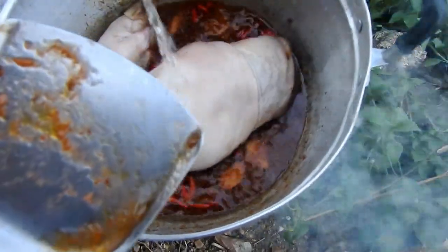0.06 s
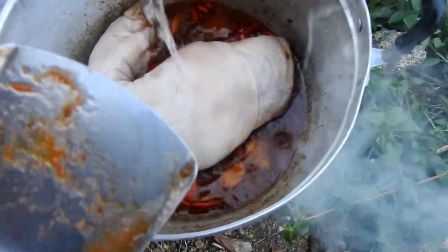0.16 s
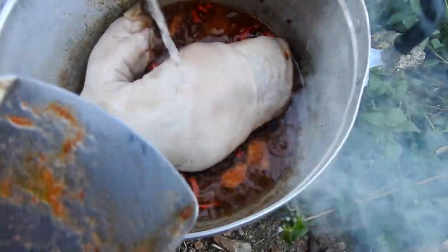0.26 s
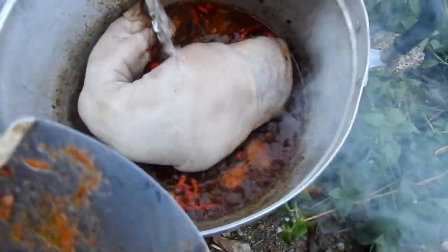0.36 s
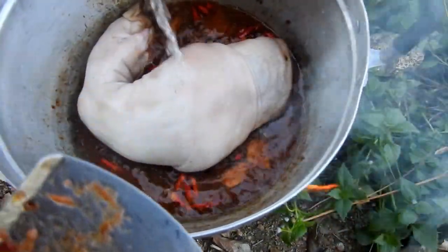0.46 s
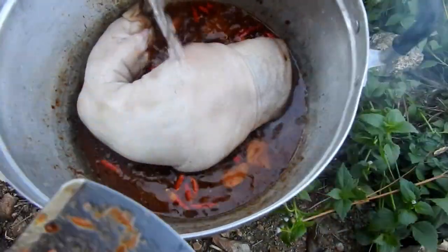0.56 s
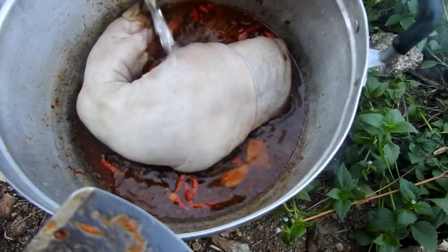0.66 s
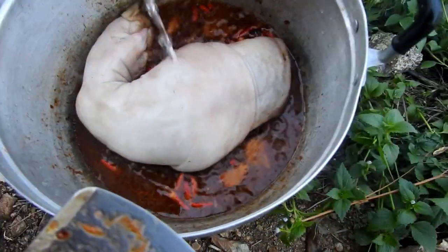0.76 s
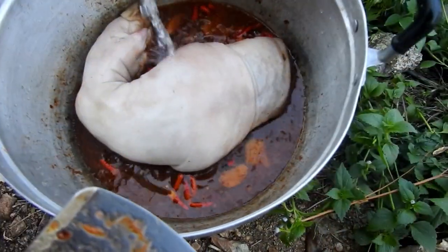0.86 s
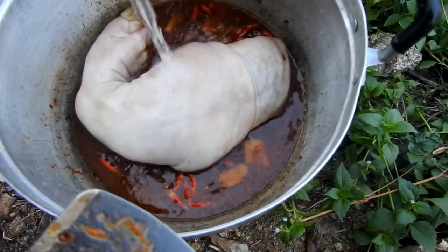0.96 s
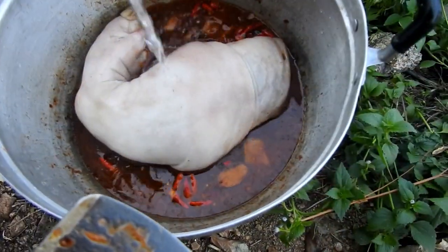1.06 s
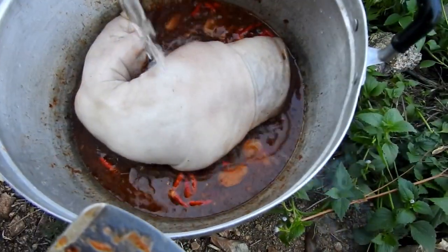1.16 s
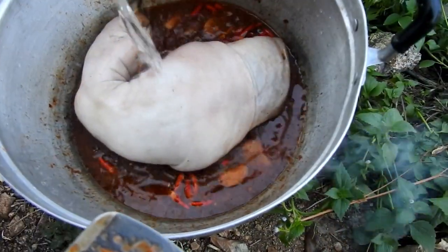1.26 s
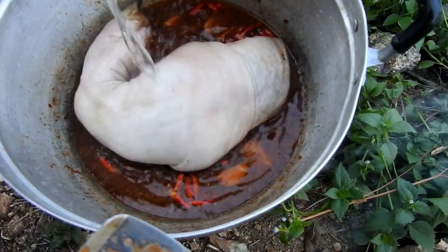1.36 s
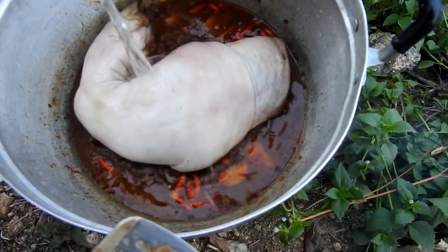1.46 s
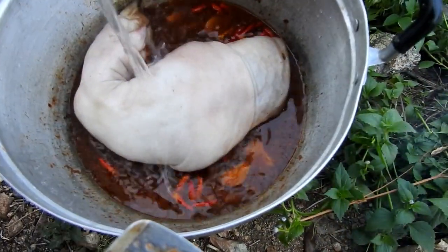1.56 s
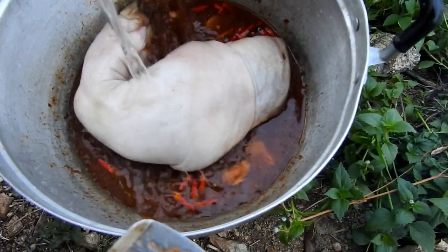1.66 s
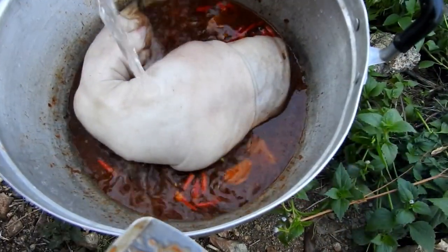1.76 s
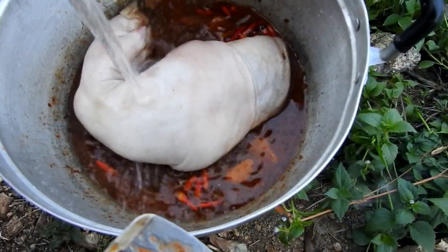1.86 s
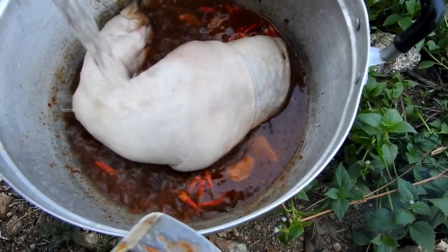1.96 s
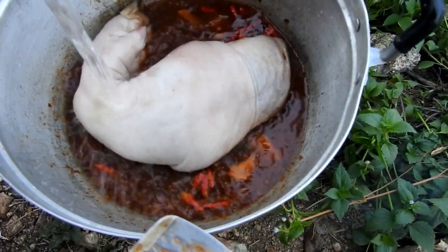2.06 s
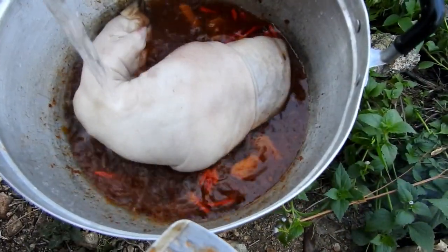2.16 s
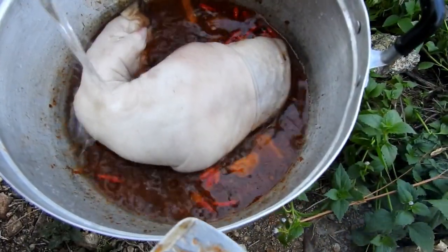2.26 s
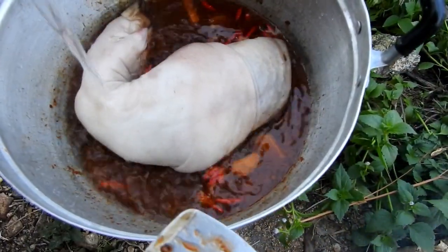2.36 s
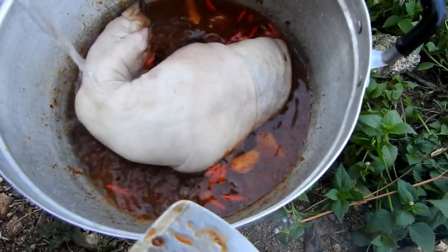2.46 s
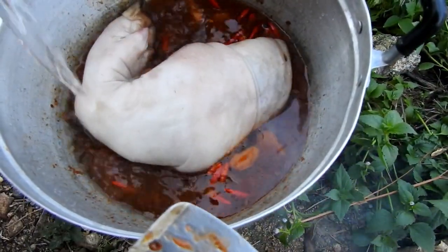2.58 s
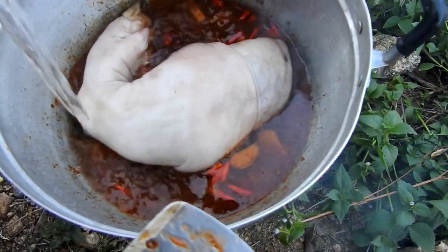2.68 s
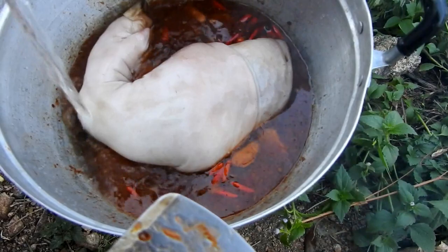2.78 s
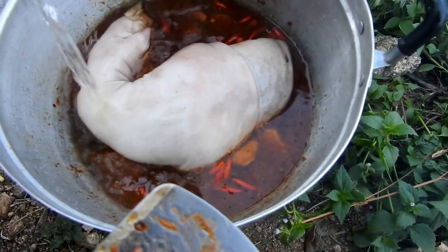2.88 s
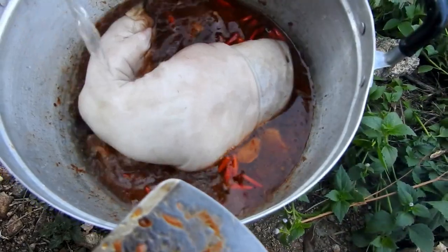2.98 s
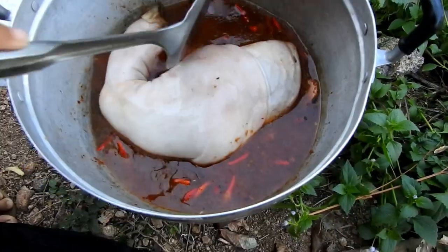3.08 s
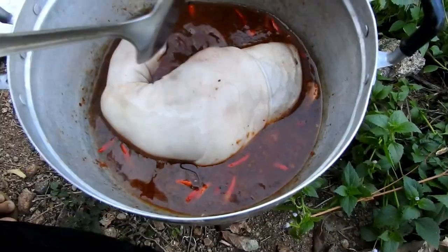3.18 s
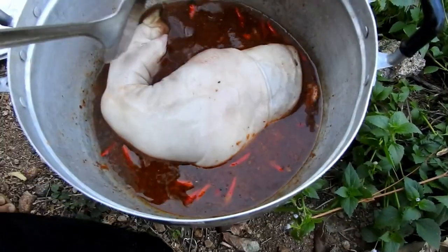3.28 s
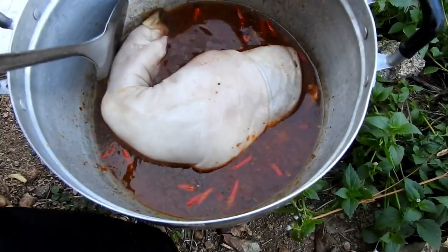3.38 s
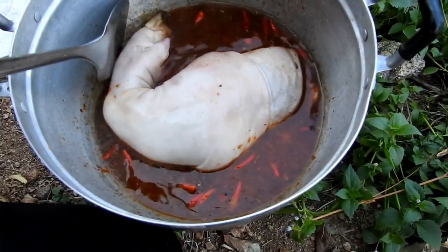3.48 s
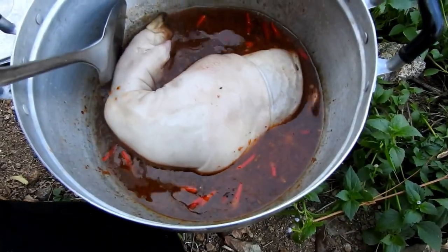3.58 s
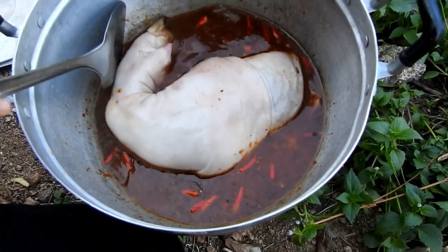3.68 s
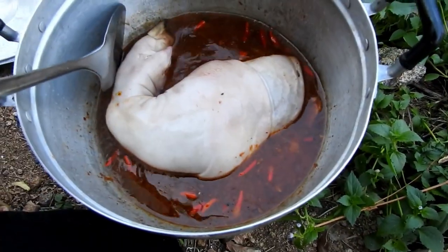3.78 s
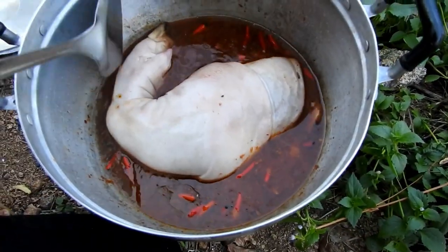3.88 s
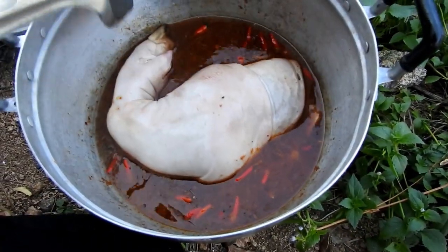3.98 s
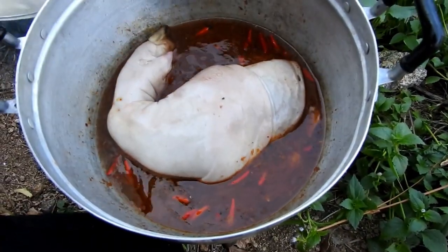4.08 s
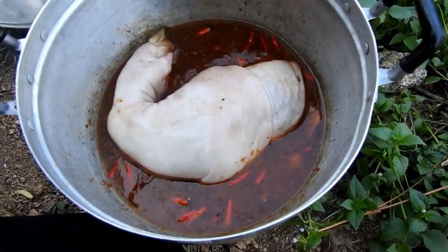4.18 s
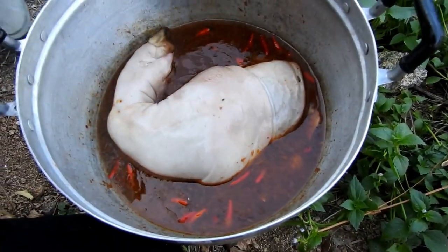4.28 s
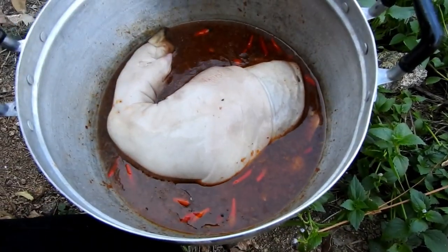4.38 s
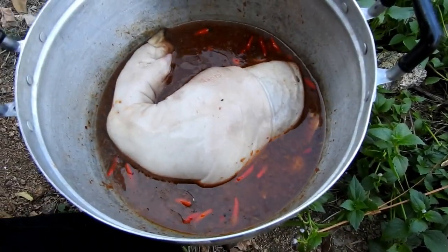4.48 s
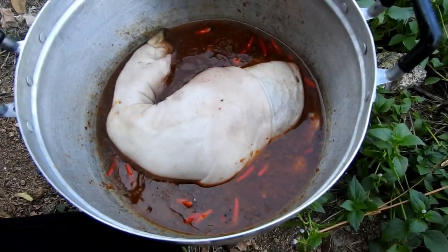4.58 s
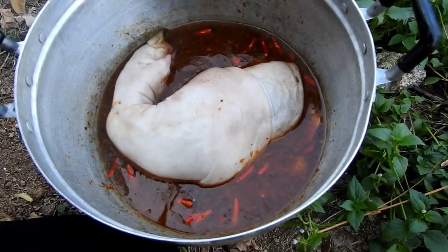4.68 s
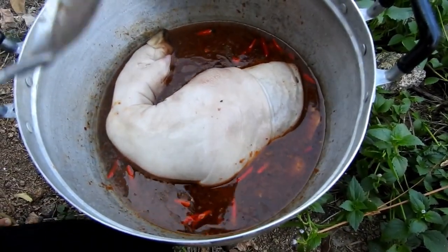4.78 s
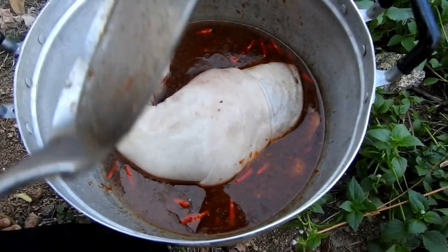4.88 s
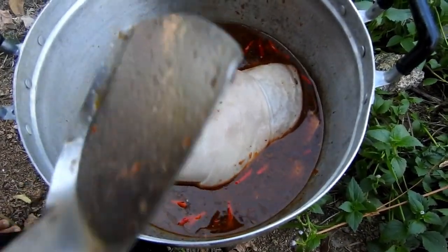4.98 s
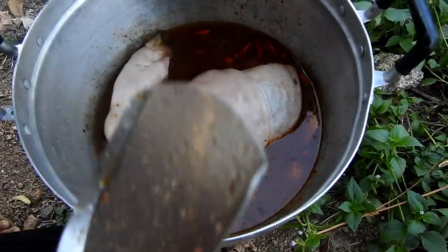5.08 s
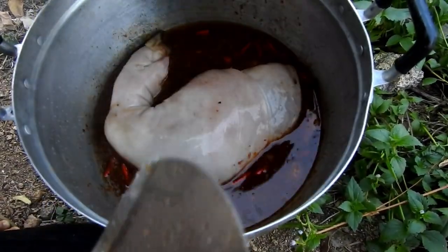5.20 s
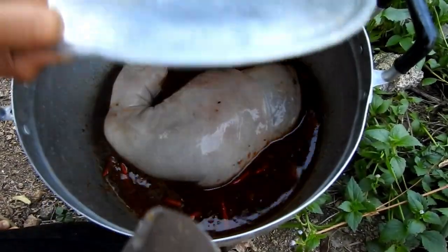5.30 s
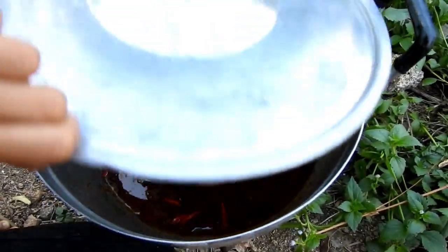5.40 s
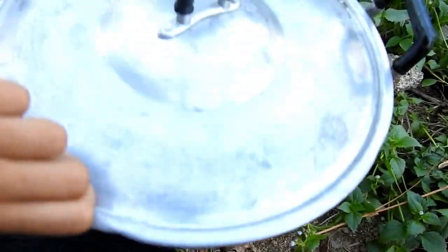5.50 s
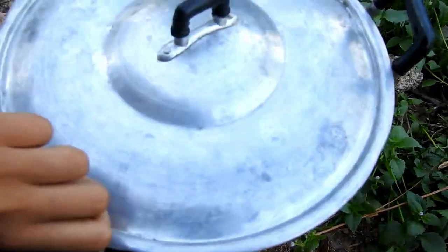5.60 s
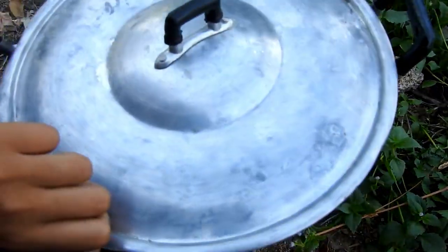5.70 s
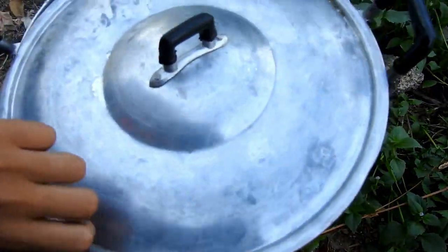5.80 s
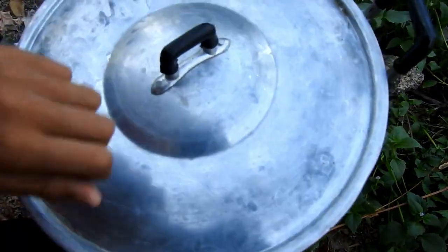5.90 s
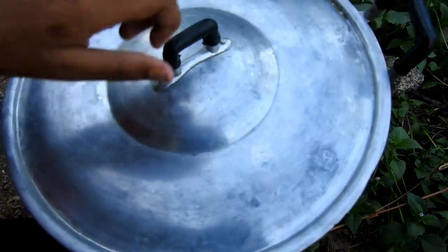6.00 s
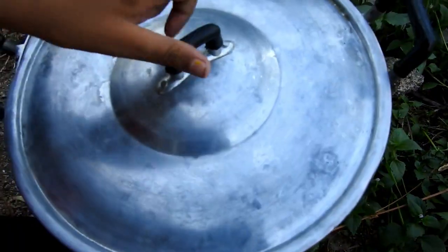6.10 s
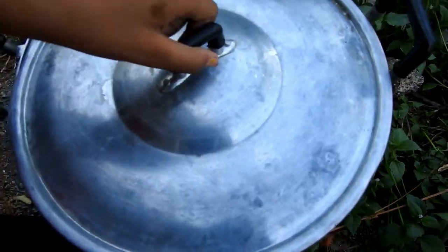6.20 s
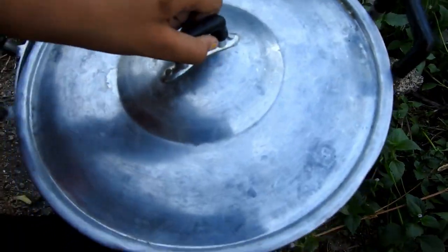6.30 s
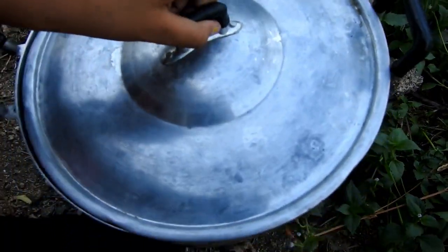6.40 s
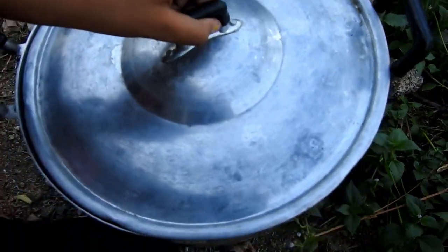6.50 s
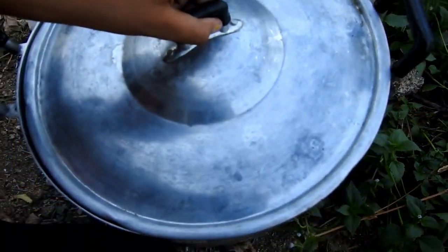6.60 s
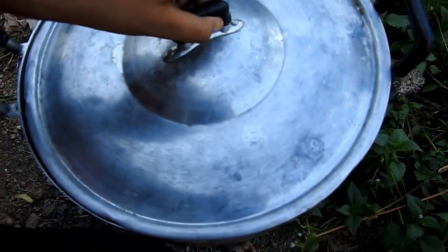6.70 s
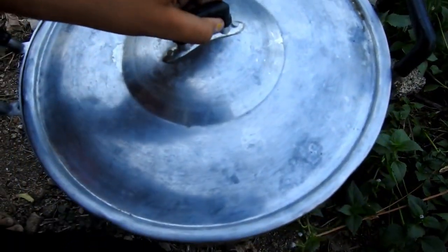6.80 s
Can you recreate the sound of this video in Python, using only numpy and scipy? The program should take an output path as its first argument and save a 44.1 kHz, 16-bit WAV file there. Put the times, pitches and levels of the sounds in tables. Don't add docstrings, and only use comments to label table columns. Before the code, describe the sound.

Water hisses and plinks onto meat in a big aluminium pot over a roaring fire; after brief silence, a spoon knocks, then the lid clatters on.

```python
import sys
import numpy as np
from scipy import signal
from scipy.fft import rfft, irfft
from scipy.io import wavfile
from scipy.ndimage import uniform_filter1d

SR = 44100
rng = np.random.default_rng(int(sys.argv[2]) if len(sys.argv) > 2 else 0)


def store_wav(level_fs):
    pcm = np.round(np.clip(np.atleast_2d(level_fs), -1, 1) * 32767)
    wavfile.write(sys.argv[1], SR, pcm.T.astype(np.int16))


def rack_gain(trim_db):
    fader = np.asarray(trim_db, float)
    return 10 ** (fader / 20)


N = 302085

# start_s, end_s
SILENCE_S = (2.854, 3.102)
# start_s, held_s, boom_db, bright_grit_db, swell_while_held_db
LID_STROKES = [(5.205, 0.0017, -10.5, -8, -2.5), (5.224, 0.082, -20, -17, 2), (5.315, 0.061, -26.5, -18, 0),
               (5.37, 0.072, -24.5, -12.5, -5.5), (5.455, 0.076, -17, -17.5, -5.5),
               (5.515, 0.15, -11.5, -18.5, -27.5), (5.657, 0.056, -12, -27.5, -33),
               (5.745, 0.058, -36.5, -39.5, 28), (5.785, 0.103, -16, -18, 2),
               (5.875, 0.13, -24.5, -15.5, 1.5), (5.975, 0.12, -16.5, -15, 0), (6.09, 0.141, -15, -17, -2),
               (6.22, 0.095, -15.5, -16.5, -2.5), (6.342, 0.035, -20, -21.5, 4),
               (6.39, 0.092, -13.5, -19, -0.5), (6.765, 0.074, -30, -38.5, -5.5)]


def rms_one(x):
    return x / np.sqrt(np.mean(x ** 2) + 1e-20)


def in_time(rows):
    t = np.arange(N) / SR
    s, db = np.transpose(rows)
    return rack_gain(np.interp(t, s, db)) * (t < s[-1])


def response(spectrum, size=4096):
    hz, db = np.transpose(spectrum)
    log_hz = np.log(np.maximum(np.arange(size // 2 + 1) * SR / size, 1))
    outside = np.maximum(np.log(hz[0]) - log_hz, 0) + np.maximum(log_hz - np.log(hz[-1]), 0)
    level_db = np.interp(log_hz, np.log(hz), db) - 30 * outside
    cepstrum = irfft(np.log(rack_gain(level_db) + 1e-7))
    cepstrum[1:size // 2] *= 2
    cepstrum[size // 2 + 1:] = 0
    h = irfft(np.exp(rfft(cepstrum)))
    return h / np.sqrt(np.sum(h ** 2))


def colour(x, spectrum):
    return signal.fftconvolve(x, response(spectrum))[:N]


def bandpass(x, low_hz, high_hz):
    return signal.sosfilt(signal.butter(3, [low_hz, high_hz], "band", fs=SR, output="sos"), x)


def treble_of(x):
    return signal.sosfiltfilt(signal.butter(6, 4100, "high", fs=SR, output="sos"), x)


def drift(rate):
    r = np.exp(-80 * np.pi * rate / SR)
    slow = signal.lfilter([1], [1, -2 * r, r * r], rng.standard_normal(N // 40 + 2002))[2000:]
    return np.interp(np.arange(N) / 40, np.arange(len(slow)), rms_one(slow))


def grit(per_s, spread_db):
    sizes = rack_gain(spread_db * np.minimum(rng.exponential(1, N), 5)) * rng.choice([-1, 1], N)
    return rms_one(sizes * (rng.random(N) < per_s / SR))


def add(out, sound, s):
    i = round(s * SR)
    out[..., i:i + sound.shape[-1]] += sound[..., :N - i]


def fire():
    # freq_hz, level_db
    roar_tone = [(25, -34), (55, -8.5), (80, -9.5), (105, 0.5), (140, -4), (204, -16), (470, -21),
                 (1150, -26.5), (1750, -31), (2630, -32.5), (4750, -31.5), (6550, -26.5), (15500, -77)]
    air = colour(rng.standard_normal(N), roar_tone)
    bass = signal.sosfilt(signal.butter(2, 220, fs=SR, output="sos"), air)
    return rack_gain(-32.5) * (air + bass * (rack_gain(1.5 * drift(4)) - 1))


def birds():
    # start_s, end_s, first_hz, last_hz, level_db
    chirps = [
        (3.272, 3.32, 2470, 3360, -59),
        (3.333, 3.403, 3550, 3250, -65),
        (3.535, 3.64, 2500, 1800, -60),
        (4.053, 4.075, 3000, 3600, -60),
        (4.815, 4.858, 2950, 3700, -68),
        (4.975, 5.06, 2950, 3350, -64),
        (4.49, 4.495, 3900, 3180, -52.5),
    ]
    out = np.zeros(N)
    for start, end, first_hz, last_hz, db in chirps:
        hz = np.geomspace(first_hz, last_hz, round((end - start) * SR))
        swell = np.hanning(len(hz)) ** .5
        warble = np.cos(np.arange(len(hz)) / 700) ** 2
        whistle = np.sin(2 * np.pi * np.cumsum(hz) / SR)
        add(out, rack_gain(db + 24.5) * swell * warble * whistle, start)
    return out


def bubble(hz, cycles, rise):
    u = np.arange(round(6 * cycles / hz * SR)) * hz / SR / cycles
    swell = u * np.exp(1 - u - 0.018 * u ** 2)
    return swell * np.sin(2 * np.pi * cycles * u * (1 + rise * (u - 2)))


def swarm(per_s, low_hz, high_hz, cycles):
    out, born = np.zeros(N), grit(per_s, 2.5)
    dealt = rng.integers(0, 14, N)
    for k, hz in enumerate(np.geomspace(low_hz, high_hz, 14)):
        out += signal.fftconvolve(born * (dealt == k), bubble(hz, cycles, 0.03))[:N] * np.sqrt(hz)
    return rms_one(out)


def water_rush():
    # time_s, hiss_db
    force = [(0.0, -22.5), (0.1, -45), (0.57, -62), (0.62, -41.5), (1.42, -42.5), (1.48, -29.5),
             (1.72, -21), (1.77, -26), (1.86, -17.5), (1.97, -31), (2.3, -24.5), (2.58, -34), (2.64, -23.5),
             (2.86, -18.5)]
    # time_s, gurgle_db
    plunge = [
        (0.0, -81),
        (1.7, -83),
        (1.95, -50),
        (2.6, -39.5),
        (2.72, -25.5),
        (2.86, -21.5),
    ]
    # freq_hz, level_db
    spray_tone = [(1290, -30.5), (2200, -24), (2950, -12.5), (3360, -17.5), (3590, 1.5), (4590, 3),
                  (6630, 5.5), (10100, -9.5), (15500, -27)]
    # freq_hz, level_db
    gurgle_tone = [(150, -51.5), (250, -31), (412, -12.5), (700, -20), (1350, -9.5), (2150, -13),
                   (3000, -3), (4400, -26)]
    fizz_tone = [(2000, -16), (4000, 8.0), (6400, 13.5), (9000, -1.0), (15000, -29.0)]
    crackle_tone = [(4000, -1.5), (7000, -0.5), (9500, -8), (15500, -22.5)]

    spray = colour(grit(2500, 4.5) * rack_gain(4.0 * drift(70)), spray_tone) * rack_gain(-12)
    bubbles_per_s = np.where(np.arange(N) < 2.4 * SR, 320, 2000)
    fizz = colour(swarm(bubbles_per_s, 2520, 9700, 2.3), fizz_tone) * rack_gain(-4.5)

    specks = swarm(200, 5000, 13000, 1.2) * rack_gain(4.0 * drift(12) - 5)
    specks = specks + grit(3000, 3.0) * rack_gain(7.0 * np.minimum(drift(70), 2) - 15)
    crackle = colour(specks, crackle_tone) * rack_gain(-42.0)

    low = colour(grit(900, 1.4), gurgle_tone) * rack_gain(2.5)
    low = low + swarm(370, 530, 2630, 1.6) * rack_gain(-19.5)
    pouring = np.arange(N) < SILENCE_S[0] * SR
    return in_time(force) * (spray + fizz) + in_time(plunge) * low + crackle * pouring


def water_drops():
    # time_s, peak_db
    meat_drops = [(0.3665, -18), (0.642, -18.5), (0.768, -15), (0.818, -23), (0.918, -26), (0.9583, -22),
                  (0.9804, -7.5), (1.0095, -3.5), (1.078, -11.5), (1.1152, -16.5), (1.1722, -24),
                  (1.3042, -16), (1.3657, -12), (1.393, -23), (1.434, -19), (1.4473, -5), (1.5224, -13.5),
                  (1.5532, -15), (1.61, -14.5), (1.6419, -11.5), (1.689, -13.5), (1.711, -12),
                  (1.7881, -6.5), (2.0408, -12), (2.12, -14.5), (2.181, -17.5), (2.2084, -8),
                  (2.3319, -12.5), (2.476, -7), (2.523, -10)]
    # time_s, peak_db, pitch_hz
    clear_bubbles = [(0.1502, -15, 4560), (0.614, -20, 4340), (1.29, -18, 5400), (1.3323, -19.5, 3440),
                     (1.589, -14, 4970), (1.6283, -14, 4100), (1.778, -14, 4250), (1.841, -9.5, 5400),
                     (1.8664, -7, 4970), (1.9116, -7.5, 4520), (2.005, -17.5, 3400), (2.086, -18, 3640),
                     (2.1184, -17.5, 3380), (2.338, -10.5, 5254), (2.366, -4, 5800), (2.444, -13.5, 2610),
                     (2.463, -16.5, 2950), (2.619, -7.5, 4550)]
    # time_s, peak_db, pitch_hz
    splashes = [(1.535, -19, 6400), (1.6358, -18, 8450), (1.641, -8, 6570), (1.6566, -15, 6430),
                (1.7053, -9, 7560), (1.719, -13, 5430), (1.7264, -14, 6000), (1.734, -10.5, 7500),
                (1.7434, -16, 6180), (1.7488, -18, 4830), (1.807, -28, 4640), (1.817, -31, 4400),
                (1.855, -10, 4770), (1.871, -3, 6760), (1.888, -22, 4610), (1.9137, -13.5, 6800),
                (1.9402, -19, 6130), (1.958, -16, 6200), (2.019, -14, 5400), (2.0337, -15, 6450),
                (2.5394, -20, 3010), (2.5544, -15, 5700), (2.5761, -21.5, 5360), (2.6032, -17, 5500),
                (2.6322, -8, 6600), (2.6412, -8.5, 5880), (2.6464, -9, 5140), (2.668, -11, 5660),
                (2.695, -11.5, 3810), (2.7065, -6.5, 5780), (2.7237, -3.5, 5180), (2.7345, -9.5, 3410),
                (2.745, -11, 2860), (2.7543, -3.5, 5900), (2.7718, -6.5, 6060), (2.7915, -2.5, 6080),
                (2.816, -7.5, 3880), (2.8228, -6.5, 5910), (2.8482, -5.5, 4580)]
    # time_s, peak_db, pitch_hz
    plinks = [(2.0394, -15.5, 6200), (2.1555, -19, 6300), (2.2405, -16, 7240), (2.217, -14, 6400),
              (2.346, -15, 3060), (2.3136, -17.5, 6200), (2.396, -12.5, 5210), (2.415, -19, 6990),
              (2.429, -18.5, 4680), (2.4994, -18, 6470), (2.5103, -14, 6800)]
    # time_s, peak_db, pitch_hz
    spits = [(.063, -34, 12030), (.104, -33, 10400), (.342, -32.5, 11000), (.382, -36, 11000),
             (.486, -20.5, 11500), (.5, -38, 11000), (.559, -37.5, 12000), (.736, -30, 10500),
             (.746, -26, 5200)]
    # time_s, peak_db, pitch_hz, cycles
    big_bubbles = [(.002, -15, 6700, 13), (0.997, -27, 3900, 10), (1.024, -26, 3980, 9.3),
                   (1.0069, -3, 4640, 1.7), (1.018, -7.5, 4140, 3.8), (1.929, -22, 1940, 4.4),
                   (2.106, -26, 3540, 16), (2.485, -21.5, 2980, 11), (2.289, -26, 2650, 10),
                   (2.804, -16, 445, 0.94), (2.837, -16.5, 1410, 6.2), (2.714, -19, 1477, 4),
                   (2.745, -13, 1910, 1.5), (2.763, -15.5, 1814, 2.5), (2.785, -14.5, 1600, 1.35),
                   (3.163, -27.5, 1960, 2.5)]

    out = np.zeros(N)
    chances = rng.uniform(-0.86, 1, len(meat_drops))
    drops = [(s, db, 6490 * (1 + 0.059 * z)) for (s, db), z in zip(meat_drops, chances)]
    drops += clear_bubbles + splashes + plinks + spits
    t = np.arange(round(.008 * SR)) / SR
    for (s, db, hz), luck in zip(drops, rng.random((len(drops), 2))):
        drop = bubble(hz, 1.6 + 2.4 * luck[0], .05 * luck[1]) * rack_gain(db + 1.5)
        burst = rng.standard_normal(len(t)) * np.exp(-t / .0018)
        spray = np.convolve(drop, np.append(burst, 0)) / np.linalg.norm(drop)
        drop = .9 * np.pad(drop, (0, len(burst))) + .2 * rack_gain(db) * spray
        add(out, drop, s)
        add(out, drop * rack_gain(-11), s + .0028)
    for s, db, hz, cycles in big_bubbles:
        add(out, bubble(hz, cycles, .006) * rack_gain(db), s)
    return out


def stream():
    return (water_rush() + water_drops()) * rack_gain([[.7], [-.7]])


def strokes(rows, attack_s, fall_db_per_s, column):
    t, out = np.arange(N) / SR, np.zeros(N)
    touch_db = -34
    for row in rows:
        s, held, db, swell_db = row[0], max(row[1], 0), row[column], row[-1]
        shape = np.interp(t - s, [0, attack_s, attack_s + held + 1e-4], [touch_db, 0, swell_db])
        fall = fall_db_per_s * np.clip(t - s - attack_s - held, 0, 1)
        out = np.maximum(out, rack_gain(db + shape - fall) * (t >= s))
    return uniform_filter1d(out, size=90)


def ring(x, modes, wander_db):
    out, total = 0, np.sqrt(sum(rack_gain(db) ** 2 for hz, db, t60 in modes))
    for hz, db, t60 in modes:
        r, w = rack_gain(-60 / (t60 * SR)), 2 * np.pi * hz / SR
        feed = x * rack_gain(db + wander_db * np.clip(drift(9), -2, 1.5)) + 1e-18
        strength = 2 * np.sqrt(1 - r) * np.sin(w)
        out = out + signal.lfilter([0, strength], [1, -2 * r * np.cos(w), r * r], feed)
    return out / total


def sheet(x, t60):
    t, out = np.arange(round(t60 * SR)) / SR, 0
    shares = rack_gain([6 * drift(9) for _ in range(3)])
    shares = shares / np.sqrt(np.sum(shares ** 2, axis=0))
    for noise, share in zip(rng.standard_normal((3, len(t))), shares):
        body = noise * rack_gain(-60 * t / t60)
        out = out + signal.fftconvolve(x * share, body / np.sqrt(np.sum(body ** 2)))[:N]
    return out


def patchy(x, patchy_db, rate):
    edges = 1000 * 2 ** np.arange(0, 3.5, 1 / 3)
    change = 0
    for pair in zip(edges, edges[1:]):
        band = signal.sosfiltfilt(signal.butter(2, pair, "band", fs=SR, output="sos"), x)
        change = change + band * (rack_gain(patchy_db * np.clip(drift(rate), -2.5, 1.8)) - 1)
    return x + change


def late_treble(x):
    treble = treble_of(x)
    return x - treble + np.roll(treble, round(.0095 * SR), axis=-1)


def spoon():
    # start_s, held_s, pot_wall_db, bright_grit_db, swell_while_held_db
    rows = [(3.413, 0.006, -14.5, -15, 1), (3.426, 0.039, -22, -20, 4), (3.592, 0.0024, -20.5, -11, -3),
            (3.657, 0.0024, -20, -18.5, -4), (3.764, 0.003, -21, -50, -1), (3.819, 0.012, -30, -35, 6.5),
            (3.84, 0.097, -32.5, -17, 6), (3.89, 0.067, -32, -11.5, -1), (4.134, .012, -39, -28, -4),
            (4.171, 0.112, -38, -32.5, 1), (4.29, .012, -29, -14, -7), (4.315, 0.027, -38, -21.5, 3),
            (4.354, 0.034, -29.5, -18.5, -7.5), (4.4, 0.026, -38, -26.5, -1.5)]
    # freq_hz, level_db
    wall_tone = [(120, -32.5), (200, -15), (371, 6), (571, -2.5), (1240, 5), (1400, -2), (2800, -1),
                 (3900, -11)]
    # freq_hz, level_db
    grit_tone = [(1290, -33), (2200, -12.5), (3130, -0.5), (3830, 3), (4700, 4), (5600, 6.5), (7100, -0.5),
                 (8600, -18.5), (15500, -47)]
    # pitch_hz, level_db, t60_s
    held_modes = [(2328, 11.5, 0.064), (2680, -5, 0.042), (3900, 5.5, 0.073)]
    # pitch_hz, level_db, t60_s
    free_modes = [(1055, -9, 0.45), (1717, -1.5, 0.13), (2374, -16, 0.27), (3210, -16, 0.081),
                  (3830, -3.5, 0.14), (4720, 4, 0.06), (7160, -11, .28)]
    # pitch_hz, level_db, t60_s
    laid_modes = [(1870, -13, .08), (2460, 6, 0.07), (3910, 11, 0.05), (4970, -14, .05), (6000, -12, .05)]

    def bright_gain(some_rows):
        return strokes(some_rows, attack_s=0.0036, fall_db_per_s=699.5, column=3)

    rub = grit(8000, 1.8) * rack_gain(1.3 * drift(40))
    t = np.arange(N) / SR - rows[6][0]
    rub = rub * rack_gain(3 * np.cos(2 * np.pi * 82 * t) * (t > 0) * (t < .1))
    wall = rub * strokes(rows, attack_s=0.0036, fall_db_per_s=400, column=2)
    bright = rub * bright_gain(rows)
    out = colour(wall, wall_tone) * rack_gain(-5.5)
    out = out + colour(0.8 * bright + sheet(bright, .016), grit_tone) * rack_gain(-4.5)
    out = patchy(out, patchy_db=2.0, rate=25)
    grips = [(held_modes, rows[:2], -14), (free_modes, rows[2:4], -14),
             (free_modes, rows[6:8], -16), (laid_modes, rows[8:], -16)]
    for modes, grip_rows, db in grips:
        out += ring(rub * bright_gain(grip_rows), modes, wander_db=1.2) * rack_gain(db)
    return out * rack_gain([[.8], [-.8]])


def lid():
    # freq_hz, level_db
    boom_tone = [(110, -41.5), (180, -15.5), (303, 0.5), (392, -3.5), (960, -6.5), (1470, -2), (2300, -43),
                 (3500, -72)]
    # freq_hz, level_db
    grit_tone = [(1060, -7.5), (1700, -7), (2300, -12), (2950, -8), (4400, -5.5), (6530, -2), (9880, -27),
                 (15500, -66)]
    # pitch_hz, level_db, t60_s
    low_modes = [(267, -11, 0.22), (312, 8.5, 0.086), (466, -22, 0.087), (545, 6, 0.025), (809, -2.5, 0.22),
                 (899, 7.5, 0.019), (984, 6.5, 0.16), (1040, -33, 0.12), (1220, -9, 0.091),
                 (1340, -2.5, 0.38), (1366, 2.5, 0.1), (1462, 9, 0.13), (1647, 1.5, 0.12),
                 (1740, -31, 0.084)]
    # pitch_hz, level_db, t60_s
    high_modes = [(2063, 4.5, 0.051), (2340, -10, 0.084), (2610, 10, 0.076), (2950, 0, 0.11),
                  (3180, 3, 0.037), (3900, 1, 0.11), (3980, 10.5, 0.12), (4500, -2, .1), (4500, 13.5, 0.03),
                  (4800, -7, .07)]

    rub = grit(3500, 3.2) * rack_gain(2.8 * drift(80))
    catch = grit(900, 3.0) * rack_gain(1.8 * drift(70))
    boom = catch * strokes(LID_STROKES, attack_s=0.0094, fall_db_per_s=383, column=2)
    bright = rub * strokes(LID_STROKES, attack_s=0.0094, fall_db_per_s=484, column=3)
    low = colour(1.02 * boom + sheet(boom, 0.13), boom_tone) * rack_gain(-6.5)
    low = low + ring(boom, low_modes, wander_db=2.0) * rack_gain(-6.0)
    high = colour(bright + sheet(bright, 0.063), grit_tone) * rack_gain(-3.0)
    high = high + ring(bright, high_modes, wander_db=6.5) * rack_gain(-13)
    high = patchy(high, patchy_db=2.0, rate=22)
    return (low + high) * rack_gain([[.35], [-.35]])


def singing():
    # start_s, until_s, pitch_hz, level_db, t60_s
    lone_modes = [(3.428, 3.483, 372.4, -28, 0.068), (3.429, 3.488, 1226, -29, 0.045),
                  (3.6, 3.62, 1717, -38.5, 0.56), (3.88, 3.99, 1717, -25.5, 0.43),
                  (3.95, 3.98, 2374, -34.5, 0.41), (4.143, 4.145, 1010, -30, 0.23),
                  (4.301, 4.312, 1014, -32.5, 0.25), (3.955, 3.97, 7160, -36.5, 0.4),
                  (5.255, 5.34, 1273, -21, 0.089), (5.888, 5.965, 992, -16.5, 0.042),
                  (3.594, 3.598, 3110, -25.5, 0.078), (3.657, 3.661, 3090, -30, 0.074),
                  (4.295, 4.33, 3970, -33, .1), (4.36, 4.42, 4000, -36, 0.16),
                  (3.86, 3.95, 3070, -29, 0.045), (5.455, 5.49, 984, -20.5, 0.2),
                  (5.583, 5.594, 809, -16.5, 0.21), (5.68, 5.706, 809, -26.5, 0.28),
                  (6.104, 6.344, 312, -21.5, 0.12), (6.404, 6.49, 267, -20.5, 0.18),
                  (6.487, 6.494, 1366, -32.5, 0.52), (6.772, 6.79, 952, -28, 0.2)]
    # start_s, until_s, pitch_hz, level_db, t60_s
    lid_turns = [(5.242, 5.297, 307.4, -30, 0.14), (5.25, 5.308, 462, -25.5, .08),
                 (5.336, 5.358, 1060, -25.5, 0.071), (5.343, 5.375, 468, -24.5, 0.073),
                 (5.422, 5.479, 596, -25, 0.037), (5.44, 5.463, 817, -26.5, .1),
                 (5.46, 5.552, 1493, -23, 0.093), (5.526, 5.564, 368, -30, 0.069),
                 (5.583, 5.589, 297, -21, 0.065), (5.708, 5.747, 320, -34, .1),
                 (5.788, 5.845, 326, -18.5, 0.092), (5.812, 5.862, 479.5, -23.5, 0.05),
                 (5.817, 5.872, 991, -25, 0.09), (5.984, 5.99, 552, -17, 0.028),
                 (6.027, 6.065, 917, -23.5, 0.061), (6.018, 6.039, 1480, -23.5, 0.072),
                 (6.047, 6.065, 576, -23.5, 0.035), (6.124, 6.129, 958, -12.5, .12),
                 (6.184, 6.21, 815, -17, 0.041), (6.213, 6.242, 984, -19, 0.092),
                 (6.269, 6.302, 945, -17, 0.19), (6.31, 6.324, 312, -19, 0.04),
                 (6.383, 6.415, 980, -17.5, 0.055), (6.461, 6.486, 1366, -20, 0.044)]
    out = np.zeros(N)
    wobbles = [1.4 * drift(54), 3.0 * drift(40), 4.9 * drift(51), 3.0 * drift(40)]
    flutters = rack_gain(np.minimum(wobbles, 2))
    for k, (start, until, hz, db, t60) in enumerate(lone_modes + lid_turns):
        t = np.arange(round((until - start + t60) * SR)) / SR
        swell = np.minimum(t / (until - start), 1) ** .35
        which = 1 + k % 3 if start > LID_STROKES[0][0] else 0
        flutter = np.resize(flutters[which][round(start * SR):], len(t))
        level = rack_gain(db + 3 - 60 * np.maximum(t - until + start, 0) / t60)
        add(out, level * swell * flutter * np.sin(2 * np.pi * hz * t), start)
    return out


def knocks():
    # time_s, peak_db, thud_hz
    blows = [(0.684, -17.5, 445), (3.12, -19, 650), (3.164, -18.5, 920), (3.318, -24, 647),
             (3.4155, 0, 2860), (3.4163, -9, 700), (3.407, -25, 1500), (3.593, -15.5, 480),
             (3.657, -16, 1250), (3.765, -9.5, 225), (3.804, -18.5, 980), (3.822, -10, 336),
             (3.766, -11.5, 710), (3.823, -13, 710), (3.85, -17.5, 740), (3.854, -13.5, 245),
             (3.877, -16.5, 186), (4.183, -20, 2260), (4.373, -24, 900), (4.297, -30, 985),
             (5.029, -26, 2040), (5.06, -23, 2200), (5.2132, -1, 1980), (5.2136, -3.5, 480),
             (5.293, -3.5, 1380), (5.385, -4.5, 1700), (5.508, 3.5, 807), (5.58, -3, 810),
             (5.664, -2.5, 410), (5.677, -4.5, 826), (5.794, 0, 508), (5.81, -5.5, 451), (5.873, 1, 900),
             (5.877, -2, 326), (5.917, -3, 961), (6.223, 0.5, 960), (6.275, -3, 930), (6.401, -0.5, 990),
             (6.429, 0.5, 264), (6.479, -3.5, 292)]
    # time_s, peak_db
    bright_ticks = [(3.428, 1), (3.4417, -6), (3.604, -4.5), (3.634, -30), (3.6681, -9), (3.854, -7),
                    (3.964, -0.5), (4.306, -13), (4.388, -23), (4.501, -13), (4.859, -21.5), (5.041, -28),
                    (4.368, -21), (4.43, -13.5), (5.2263, -4), (5.252, -11), (5.3025, -2), (5.522, -4.5),
                    (5.81, -3.5), (5.886, -12), (6.054, -12), (6.135, -12.5), (6.236, -8), (6.41, -3)]
    out, t = np.zeros(N), np.arange(round(0.061 * SR)) / SR
    for (s, db, hz), noise in zip(blows, rng.standard_normal((len(blows), len(t)))):
        crack = bandpass(np.abs(noise) * np.exp(-t / .0006), 250, np.clip(5 * hz, 1800, 3900))
        thud = np.sin(2 * np.pi * hz * t) * np.exp(-t / (.0025 + 1.5 / hz))
        add(out, rack_gain(db) * (0.48 * crack / np.abs(crack).max() + .5 * thud), s + 0.00229)
    for (s, db), noise in zip(bright_ticks, rng.standard_normal((len(bright_ticks), len(t)))):
        tick = bandpass(noise * (np.exp(-t / .0005) + .25 * np.exp(-t / .004)), 4600, 7800)
        add(out, rack_gain(db) * tick / np.abs(tick).max(), s)
    return out


def ducking(near, over_db=-15, share=3.4):
    power = signal.lfilter([.0002], [1, .0002 - 1], near.mean(axis=0) ** 2)
    return rack_gain(-share * np.maximum(10 * np.log10(power + 1e-12) - over_db, 0))


def scene():
    near = stream() + late_treble(spoon() + lid()) + singing() + knocks()
    near = signal.sosfilt(signal.butter(4, 135, "high", fs=SR, output="sos"), near)
    return near + (fire() + birds()) * ducking(near) * rack_gain([[.3], [-.3]])


def band_limit(x):
    return signal.sosfilt(signal.butter(12, 15720, fs=SR, output="sos"), x)


def record(dry):
    # freq_hz, side_minus_mid_db
    width = [(40, -19), (90, -20), (250, -33), (700, -17), (1400, -17.5), (2800, -13), (5600, -9),
             (15000, -12.5)]
    treble_gaps = [3.418, 5.218, 5.512, 5.797, 5.876, 6.226]
    t = np.arange(N) / SR
    side = colour(dry.mean(axis=0) * drift(200) * rack_gain(-11), width)
    both = dry + side * [[1], [-1]]
    gap = uniform_filter1d(sum(1. * (t > s) * (t < s + .0085) for s in treble_gaps), size=40)
    both = both - .93 * gap * treble_of(both)
    overloaded = both / (1 + np.abs(both / 0.96) ** 6) ** (1 / 6)
    live = uniform_filter1d(1. * ((t < SILENCE_S[0]) | (t > SILENCE_S[1])), size=60)
    return band_limit(overloaded * live)


dry = scene()
out = record(dry)
store_wav(out)
```